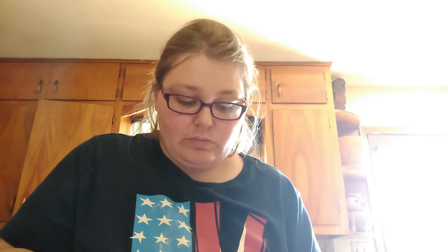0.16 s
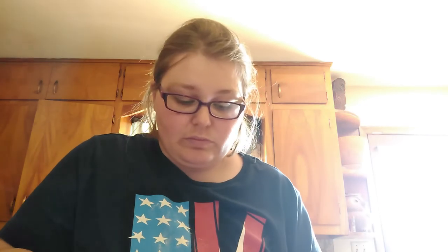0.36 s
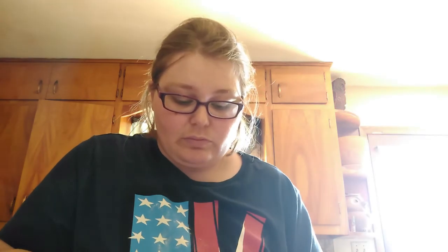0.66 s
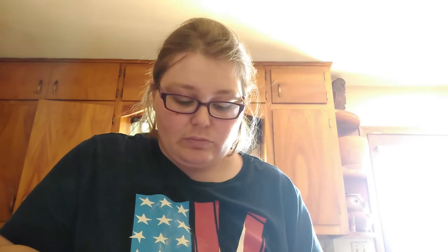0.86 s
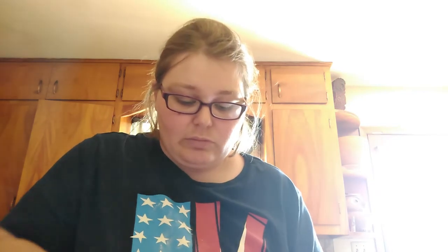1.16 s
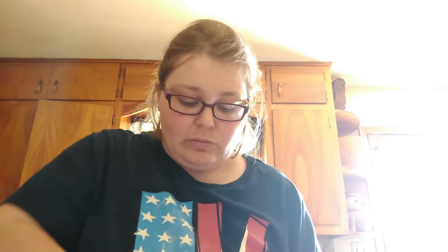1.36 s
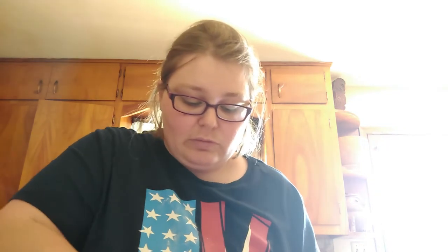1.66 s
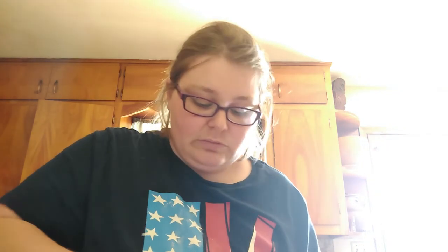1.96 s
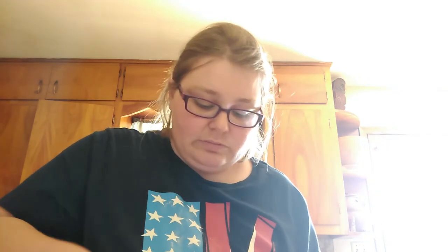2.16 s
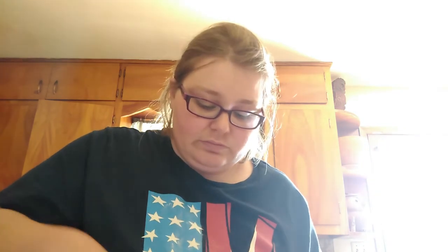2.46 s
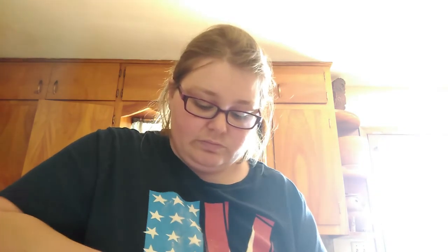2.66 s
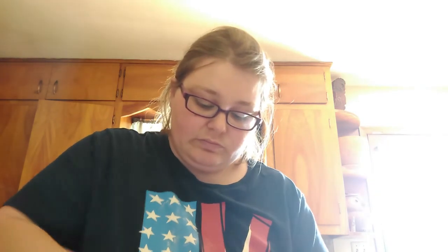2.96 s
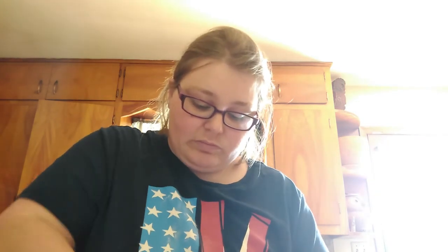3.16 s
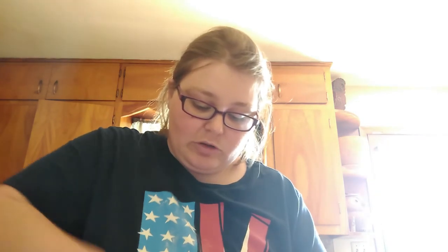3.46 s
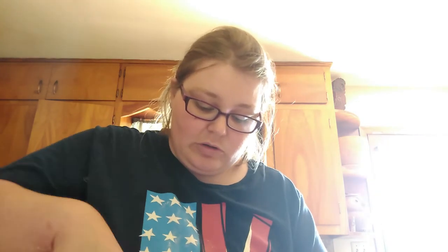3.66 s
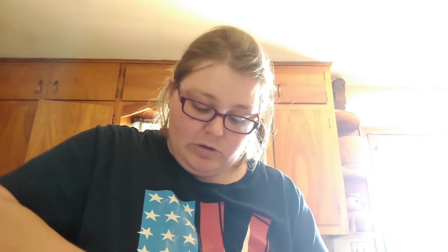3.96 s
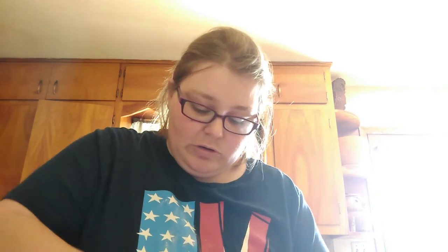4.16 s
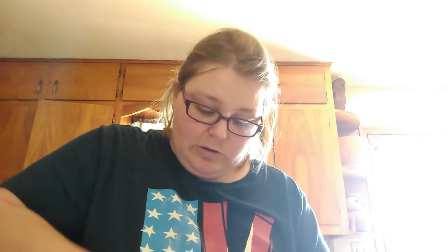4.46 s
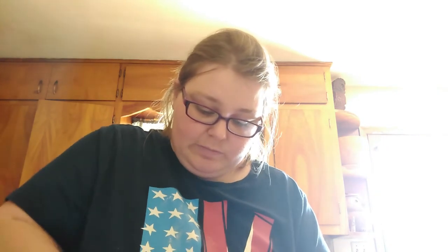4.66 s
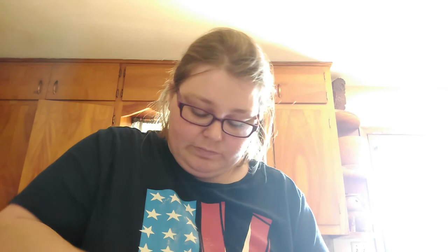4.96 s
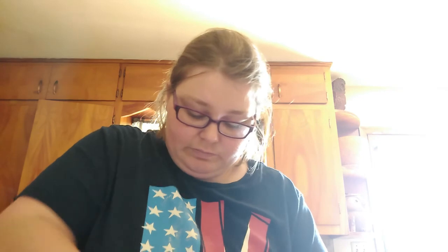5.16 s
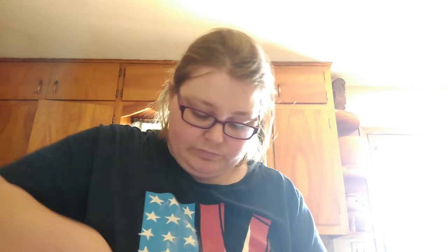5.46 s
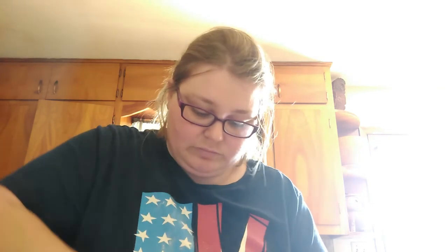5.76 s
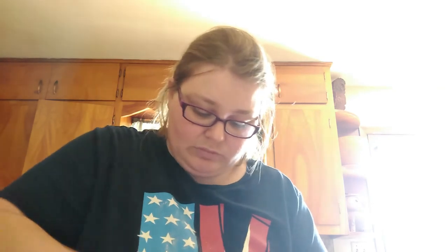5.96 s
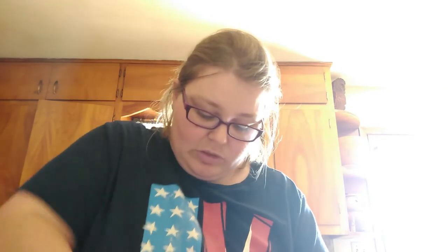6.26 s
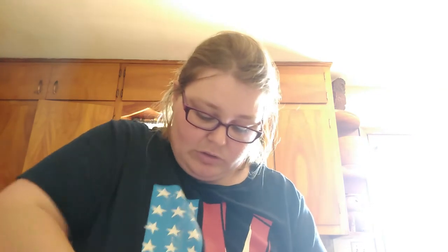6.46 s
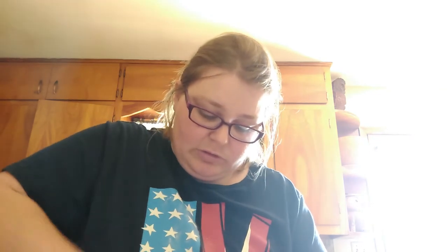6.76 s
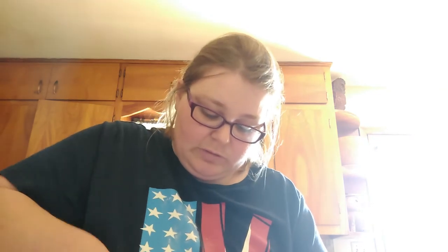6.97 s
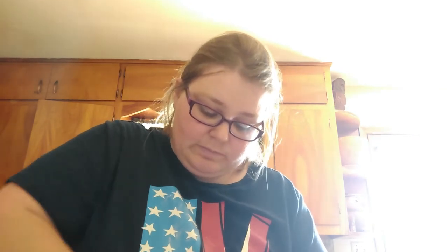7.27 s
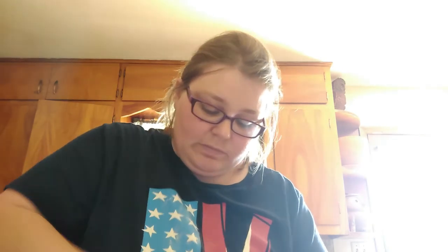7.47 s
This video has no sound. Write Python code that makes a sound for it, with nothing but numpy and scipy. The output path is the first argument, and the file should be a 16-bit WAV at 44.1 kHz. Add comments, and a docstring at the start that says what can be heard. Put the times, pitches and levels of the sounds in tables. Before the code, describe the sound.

Close, bright scraping strokes of dough against a bowl, a sudden sharp bang at two seconds, then softer thumps in a small room.

```python
"""Hands knead dough in a mixing bowl on a kitchen counter, close to a two-port microphone standing on it.
Dough and fingers rub the bowl wall: bands of noise swell and fade with each stroke.
Sticky dough ticks as it lets go (short noise bursts), and the bowl bumps the counter (dying sine waves).
The bowl drags with a low murmur, and the small room adds a short echo.
A fan (steady noise) and a motor hum (narrow bands of noise) fill the room."""
import sys
import numpy as np
from scipy import signal
from scipy.fft import rfft, irfft, next_fast_len
from scipy.io import wavfile
from scipy.ndimage import uniform_filter1d, map_coordinates

SR = 44100
rng = np.random.default_rng(int(sys.argv[2]) if len(sys.argv) > 2 else 0)


def wrap_up_sound(samples):
    """Save the sound to the file named by the first command line argument, as 16-bit audio."""
    columns = np.atleast_2d(samples).T
    # keep every value between -1 and 1, then stretch to whole-number steps
    tamed = np.clip(columns, -1, 1)
    steps = np.round(tamed * 32767).astype(np.int16)
    wavfile.write(sys.argv[1], SR, steps)


N = 336247  # length in samples


def amp(db):
    """Turn dB into a gain."""
    return 10 ** (np.asarray(db) / 20)


def unit(x):
    """Scale to an rms of 1."""
    return x / np.sqrt(np.mean(x ** 2) + 1e-20)


def along(points, hz):
    """Read a curve of (Hz, value) points on a logarithmic frequency axis."""
    point_hz, value = np.transpose(points)
    return np.interp(np.log(hz + 1), np.log(point_hz + 1), value)


def wobble(rate):
    """A smooth random curve with a given number of random points a second."""
    points = rng.standard_normal(int(N * rate / SR) + 4)
    return map_coordinates(points, [np.arange(N) * rate / SR])


def filtered(x, response):
    """Shape a sound by a response that depends on frequency."""
    size = next_fast_len(N + SR // 2)
    spectrum = rfft(x, size) * response(np.fft.rfftfreq(size, 1 / SR))
    return irfft(spectrum, size)[..., :N]


def patchy(pair, depth_db):
    """Noise whose colour changes in small patches of time and frequency."""
    z = signal.stft(pair, nperseg=256)[2]
    field = rng.standard_normal(z.shape[1:])
    field = uniform_filter1d(field, size=5, axis=0)  # smooth over frequency
    field = uniform_filter1d(field, size=9, axis=1)  # smooth over time
    return signal.istft(z * amp(depth_db * unit(field)), nperseg=256)[1][:, :N]


def stereo(pair, spectrum, alike):
    """Colour two unrelated signals and mix them so left and right are partly alike; rms 1."""
    def response(hz):
        turn = np.arccos(np.clip(along(alike, hz), -1, 1)) / 2
        return amp(along(spectrum, hz)) * [np.cos(turn), np.sin(turn)]
    mid, side = filtered(pair, response)
    return unit(np.array([mid + side, mid - side]))


def sides(pan_db):
    """Gains of left and right for a left-right difference in dB."""
    return amp(np.array([pan_db / 2, -pan_db / 2]))


def add(track, s, sound, lag_s):
    """Place a two-channel sound at s seconds; it reaches the right port lag_s later."""
    for ch in range(2):
        first = round((s + ch * lag_s) * SR)
        track[ch, first:][:sound.shape[1]] += sound[ch]


def appliances():
    """Air pushed by a fan makes broad noise; a motor hums in narrow bands of wavering strength."""
    # Colour of the fan noise. Each row: frequency in Hz, relative level in dB per Hz.
    fan_colour = [(18, -39.5), (30, -15.5), (64, -2), (127, -4), (173, -3.5), (220, -7), (343, -6.5),
                  (412, -12), (835, -10), (1170, -20.5), (1690, -18), (3090, -29.5), (4710, -21.5),
                  (11800, -69.5), (15700, -63.5)]
    # How alike left and right are. Each row: frequency in Hz, likeness from 0 to 1.
    fan_likeness = [(60, 0.94), (240, 0.82), (950, 0.052), (3770, 0.05), (15000, 0.01)]
    # Hum of the motor. Each row: frequency in Hz, half width of the band in Hz, level in dB.
    hum_lines = [(62, 5.1, -73), (178.76, 3.5, -69.5), (264.6, 5, -75), (357.8, 7, -73),
                 (476.3, 5.5, -81.5), (686, 2.8, -80)]
    fan_db = -62.5 + 0.8 * wobble(2.2)
    fan_noise = patchy(rng.standard_normal((2, N)), depth_db=1.5)
    out = amp(fan_db) * stereo(fan_noise, fan_colour, fan_likeness)
    for hz, width, db in hum_lines:
        line = filtered(rng.standard_normal(N), lambda f: 1 / (1 + ((f - hz) / width) ** 2))
        out = out + amp(db + 2.6 * wobble(7)) * unit(line)
    return out


def kitchen(x):
    """The room answers with a short echo in which each frequency dies at its own speed."""
    # Echo of the room. Each row: frequency in Hz, time to fall by 60 dB in seconds.
    echo_fade = [(100, .4), (1000, 0.14), (5000, 0.14), (14000, 0.25)]
    hz, t, z = signal.stft(rng.standard_normal((2, SR // 2)), SR, nperseg=256)
    fade = amp(-60 * t / along(echo_fade, hz)[:, None])
    tail = signal.istft(z * fade, SR, nperseg=256)[1]
    delayed = np.pad(x, ((0, 0), (200, 0)))  # the echo starts 200 samples late
    return signal.fftconvolve(delayed, tail / np.linalg.norm(tail[0]), axes=1)[:, :N]


def dragging():
    """The bowl drags under the push: a low, lumpy murmur in the counter's middle resonances."""
    # Each row: start in seconds, end in seconds, level in dB before the push shapes it, centre in Hz.
    drags = [(0.922, 1.5, -72.5, 414), (2.5, 3.098, -69, 500), (3.45, 3.8, -75.5, 775),
             (3.93, 4.124, -63, 517), (4.997, 5.192, -63.5, 484), (6.12, 6.382, -61.5, 544)]
    half_width_oct = 0.31
    out, t = np.zeros((2, N)), np.arange(N) / SR
    for start, end, db, centre in drags:
        push = np.sin(np.pi * np.clip((t - start) / (end - start), 0, 1)) ** 0.7
        band = lambda hz: np.exp(-(np.log2((hz + 1) / centre) / half_width_oct) ** 2 / 2)
        noise = filtered(rng.standard_normal((2, N)), band)
        murmur = stereo(noise, [(500, 0)], [(500, 0.42)])  # no more colour, likeness 0.42
        out += amp(db + 2.4 * wobble(40)) * push * murmur
    return out


def ticks():
    """Sticky dough letting go and hard contacts: a snap and its short crackle in one resonance."""
    # Each row: start in seconds, peak in dB before panning, centre in Hz, width in Hz,
    # left-right difference in dB.
    snaps = [(0.3052, -27, 3040, 1500, 8), (.312, -28.5, 3200, 900, 3), (.413, -29, 5300, 900, 2),
             (.444, -38, 5200, 900, 6), (1.131, -37.5, 4400, 3000, -1.1), (1.1427, -41, 5030, 3000, 6),
             (1.269, -51, 4000, 3000, -8), (1.338, -46, 1820, 350, 3), (2.050, -12, 1803, 1500, 6.5),
             (2.05, -26, 7500, 9000, 2), (2.106, -22.5, 6000, 4030, -6), (3.079, -41.5, 5000, 4000, -1),
             (4.238, -28, 2750, 1200, 3.5), (4.2377, -22.5, 5100, 4960, 2), (4.4, -54, 2763, 597, 0),
             (4.4555, -36.5, 5120, 2980, 1), (5.531, -35, 1980, 996, -3.5), (6.322, -53, 2010, 180, 3),
             (6.501, -59, 3240, 491, 5.5), (6.660, -40, 3750, 1300, 17)]
    out, t = np.zeros((2, N + SR)), np.arange(SR // 6) / SR
    for s, db, hz, width, pan_db in snaps:
        edges = np.clip([hz - width / 2, hz + width / 2], 300, 15000)
        t60 = 0.017 + 13 / width  # seconds to fall by 60 dB; longer for a narrow resonance
        crackle = rng.standard_normal((2, len(t))) * amp(-60 * t / t60)
        crackle[:, 0] = amp(20.5)  # the snap is one strong first sample
        resonance = signal.butter(3, edges, "band", fs=SR, output="sos")
        burst = signal.sosfilt(resonance, crackle)
        burst /= np.abs(burst).max()
        add(out, s, amp(db) * sides(pan_db)[:, None] * burst, lag_s=0.00024)
    return out[:, :N]


def bumps():
    """Each contact rings the modes near its centre, over a crowd of weak modes that blur into a thud."""
    # Bumps of bowl and hands on the counter. Each row: start in seconds, peak in dB before panning,
    # centre in Hz set by the hardness of the contact, ring length share, left-right difference in dB.
    knocks = [(.305, -19, 320, .55, 1.5), (0.3117, -21.5, 587, 0.54, 3), (.314, -28.5, 69.6, 0.53, 1),
              (1.42, -51.5, 110, .88, 3), (1.548, -39, 54, 0.43, -2.5), (1.728, -45.5, 199, .29, 0),
              (2.0496, -1, 420, 1.05, 1.5), (2.056, -24, 120, 1.6, 3), (2.114, -10, 430, .85, 1.5),
              (2.646, -14, 208.7, 0.41, 1.5), (2.654, -36, 500, 0.64, 2), (2.655, -24, 100, .5, 3),
              (2.70, -27.5, 100, 0.86, 4.5), (2.736, -27.5, 60.5, 0.42, -2), (2.971, -38, 130, 0.53, 4.5),
              (2.99, -47, 65, .51, 1.5), (3.312, -46.5, 111, 0.47, 7.5), (3.331, -44, 130.4, 0.83, 8),
              (3.808, -39, 60, 0.37, -1.1), (4.274, -45.5, 200, .7, 7), (4.995, -37.5, 100, 0.304, 4),
              (5.016, -40, 61.8, 0.4, 0.5), (5.14, -47, 64.6, 0.39, -2.5), (6.136, -38, 60, 0.72, -2),
              (6.73, -45, 220, .3, 8.5), (6.781, -23, 255, 0.36, 5), (6.787, -22.5, 80, 0.23, -1.1),
              (7.307, -27, 230, .3, 5.5), (7.314, -28, 70.8, .5, 1.5)]
    # Fingertip taps that ring one or two modes of the bowl; columns as for the bumps.
    fingertips = [(4.267, -40.5, 627, 1, -2.5), (4.289, -48.5, 365, 1.9, 6), (5.073, -56, 480, 0.88, -2),
                  (6.111, -47, 545, .9, 0), (6.237, -54, 567, 0.85, 3), (6.288, -50.5, 515, 1, 2),
                  (6.357, -41, 592, 0.89, 6.5), (6.439, -49.5, 620, 1.03, 8), (6.782, -37, 570, .7, 4),
                  (7.308, -46, 520, .6, 4)]
    # Modes of counter and bowl. Each row: frequency in Hz, relative level in dB,
    # time to fall by 60 dB in seconds, before the share and the choking hands change it.
    body_modes = [(51.37, 6.5, 1), (79.5, 2.5, 0.25), (93.05, 5, .3), (131, -1, 0.29), (220.3, 2.5, 0.2),
                  (272.1, 4, 0.14), (312, 3.5, 0.13), (375.7, 5, 0.15), (436, 3, 0.1), (470.5, 0.5, 0.2),
                  (571, 6.5, 0.15), (633.3, 6, 0.15), (781, 0, 0.12), (837, 2, 0.17), (945, 1, 0.3),
                  (1035, 0.5, 0.26), (1340, -2, 0.15), (1591, 1.5, 0.19), (1712, -1, .2), (2210, 0.5, 0.15)]
    crowd_size = 110  # weak modes in a blow
    out, t = np.zeros((2, N + SR)), np.arange(SR // 3) / SR
    # Each blow leads with its reach in octaves and its build-up in cycles of the centre.
    # A bump's reach is set from its level; the sign of the reach does not matter.
    blows = [(1.15 + 0.06 * row[1], 0.64, *row) for row in knocks]
    blows += [(0.27, 1.3, *row) for row in fingertips]
    for spread, build, s, db, centre, share, pan_db in blows:
        chance = rng.standard_normal((4, len(body_modes) + crowd_size))
        weak_hz = 2600 * rng.random(crowd_size) ** 1.8 + 40
        weak_db = -9 + 1.5 * np.log2(weak_hz / 400)  # rises by 1.5 dB an octave
        weak_t60 = 0.2 * amp(1.5 * chance[3, :crowd_size])
        crowd = np.array([weak_hz, weak_db, weak_t60])
        hz, level, t60 = np.hstack([np.transpose(body_modes), crowd])[:, :, None]
        octaves = np.log2(hz / centre)
        reach_db = -np.where(octaves > 0, 7., 6.) * (octaves / spread) ** 2
        # The crowd starts out of step.
        start = np.r_[np.zeros(len(body_modes)), 2 * np.pi * rng.random(crowd_size)][:, None]
        fade_db = level + reach_db - 60 * t / (t60 * share)
        rings = amp(fade_db) * np.exp(1j * (2 * np.pi * hz * t + start))
        # Each port feels a mode at its own strength and, more so for high modes, its own phase.
        strength_db = 1.74 * chance[0] + 3.6 * chance[1:3] * np.minimum(hz.T / 500, 1)
        felt = amp(strength_db) * np.exp(1j * chance[2:0:-1] * hz.T / 900)
        sound = (felt @ rings).imag
        sound *= np.sin(np.pi / 2 * np.minimum(t * centre / build, 1)) ** 2  # soft contacts build slowly
        sound *= amp(-(t / (0.041 * share)) ** 2)  # hands and dough stay on and choke the ring
        sound /= np.linalg.norm(sound, axis=1)[:, None]
        sound /= np.abs(sound).max(1).mean()
        add(out, s, amp(db) * sides(pan_db)[:, None] * sound, lag_s=0.00013)
    return out[:, :N]


def rubbing():
    """Dense tiny slips of dough on the wall; pressure adds a deeper scrape, dry flour a sheen."""
    # Strokes along the wall. Each row: start in seconds, rise in seconds, time to fall by 60 dB in seconds,
    # hiss level in dB, deeper scrape in dB over the hiss, sheen in dB over the hiss.
    strokes = [(0, .001, .31, -63, -19, -10.5), (.301, .008, 0.31, -45, 4, -27),
               (0.383, .032, .48, -45, -6.5, -14), (.569, 0.051, 0.25, -57, -11, -13),
               (0.789, .015, 0.37, -46.5, -19.5, -8), (1.027, 0.011, .3, -51, -22, -10.5),
               (1.13, 0.0083, 0.1, -56, -6, -6), (1.458, 0.013, 0.36, -56, -23, -10.5),
               (1.871, .008, 0.27, -56.5, -17, -12), (2.051, .012, 0.2, -43, 0, -14),
               (2.099, .013, 0.28, -42, -11, -19.5), (2.287, .007, 0.26, -53.5, -35, -8),
               (2.511, .008, 0.76, -57, -13.5, -10.5), (2.628, .06, 0.29, -47, -12, -14),
               (2.98, 0.0804, 1.2, -69, 4, -4), (3.075, .007, 0.61, -52.5, -10.5, -13.5),
               (3.198, 0.083, 0.35, -50.5, -8, -17.5), (3.309, .027, 0.2, -50.5, -14.5, -8),
               (3.769, .055, 1.3, -58.5, -11.5, -7.5), (3.868, 0.077, 0.63, -48.5, -8.5, -14),
               (4.166, 0.017, 0.29, -49.5, -15, -12.5), (4.238, 0.0026, 0.35, -50.5, -10, -15),
               (4.453, 0.0042, .75, -56.5, -14, -10.5), (4.52, 0.063, 0.75, -59, -6.5, -12),
               (4.678, .012, 0.28, -40, -13, -15), (4.988, .06, 0.84, -60, -7.5, -23.5),
               (5.229, 0.065, 0.21, -55.5, -6.5, -33), (5.527, 0.0054, 0.26, -67.5, 13.5, -30),
               (5.618, 0.116, 0.47, -68.5, -0.3, -3.5), (5.73, .074, 0.29, -46, -13, -13),
               (6.059, 0.073, .54, -65.5, -6, -8), (6.14, 0.049, .89, -57, -2, -10),
               (6.25, .063, 0.17, -62.5, -4, -4), (6.66, .007, .23, -68, 0.5, -23),
               (7.208, .038, 0.42, -58.5, -10, -12), (7.404, .008, 0.29, -54, -15, -11),
               (7.593, 0.036, 0.29, -55.5, -17, -9.5)]
    # Where the hands work in the bowl. Each row: time in seconds, left-right difference in dB.
    hand_places = [(0, -1), (.6, -6), (1.13, .6), (1.5, -3), (2.05, 0), (2.4, -5.5), (2.7, 0.5), (3.2, 1),
                   (3.77, -3), (4.0, 0.5), (4.7, -0.4), (5.23, 8), (5.5, -0.7), (7.6, -.6)]
    # Colours of hiss, scrape and sheen. Each row: frequency in Hz, relative level in dB per Hz.
    hiss_colour = [(2600, -38), (3300, -14.5), (4400, -6), (4900, -1.5), (5200, 2.5), (5600, -2),
                   (6500, -4.5), (7500, -11.5), (9500, -31.5), (12500, -69.5)]
    scrape_colour = [(1100, -56), (1500, -6.5), (2000, -5.5), (3100, -3.5), (4200, -9.5), (6000, -37),
                     (8000, -80)]
    sheen_colour = [(5500, -27.5), (7500, 3.5), (9000, 0.5), (12000, -2.5), (15700, -11)]
    power = np.zeros((3, 2, N + SR))
    t = np.arange(SR) / SR
    for s, rise, t60, db, scrape_db, sheen_db in strokes:
        swell = np.sin(np.pi / 2 * np.minimum(t / rise, 1)) ** 2
        stroke = swell * amp(-60 * np.maximum(t - rise, 0) / t60)
        place = sides(np.interp(s, *np.transpose(hand_places)))[:, None]
        # The deeper scrape dies 1.1 times as fast as the hiss.
        for layer, rel_db, fades in zip(power, (0, scrape_db, sheen_db), (1, 1.1, 1)):
            add(layer, s, (amp(db + rel_db) * place * stroke ** fades) ** 2, lag_s=0)
    grit = amp(2.0 * wobble(900) + 0.7 * wobble(150) + 1.3 * wobble(30))  # uneven slip sizes
    slips = []
    # Each colour has its own left-right likeness.
    for colour, alike in ((hiss_colour, 0.15), (scrape_colour, 0.25), (sheen_colour, 0.05)):
        noise = patchy(grit * rng.standard_normal((2, N)), depth_db=2.0)
        slips.append(stereo(noise, colour, [(3000, alike)]))
    return (np.sqrt(power[..., :N]) * slips).sum(0)


def scene():
    """Everything near the bowl, its echo and the room noise."""
    knock, tick, rub = bumps(), ticks(), rubbing()
    echo = kitchen(amp(-12) * knock + amp(-10.5) * tick + amp(-4.0) * rub)
    return knock + tick + rub + echo + dragging() + appliances()


def record(dry):
    """The ports add faint hiss, differ in colour, lose the deepest bass and saturate."""
    # How the ports differ. Each row: frequency in Hz, left-right difference in dB.
    port_tilt = [(60, 4), (300, 0), (1000, 0.5), (5000, 4.4), (9000, -6.5), (15000, -1)]
    mic_db, top_hz = -89.5, 15750  # level of the microphone's own hiss; nothing is kept above top_hz
    hiss_colour = [(5000, -7), (8000, -1.5), (12500, -4.0), (13200, -25.0)]  # (Hz, relative dB)
    hiss = amp(mic_db) * stereo(rng.standard_normal((2, N)), hiss_colour, [(8000, .02)])
    bass = lambda hz: (1j * hz / (1j * hz + 28)) ** 4
    x = filtered(dry + hiss, lambda hz: sides(along(port_tilt, hz)) * bass(hz))
    x = x / (1 + np.abs(x / .9) ** 6) ** (1 / 6)  # the input rounds off peaks near 0.9
    return filtered(x, lambda hz: hz < top_hz)


dry = scene()
out = record(dry)
wrap_up_sound(out)
```